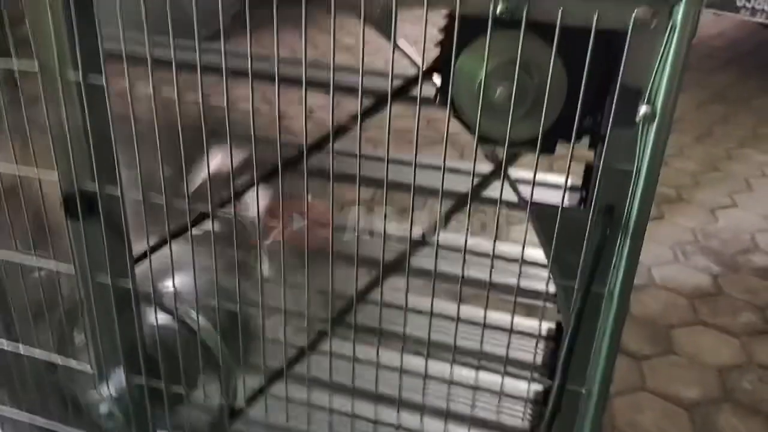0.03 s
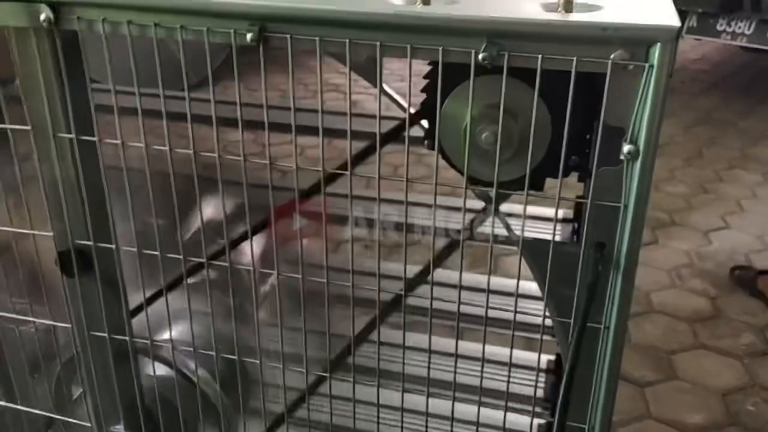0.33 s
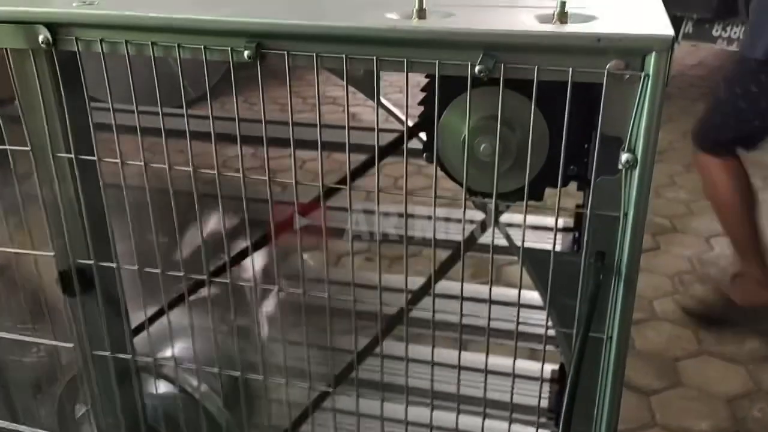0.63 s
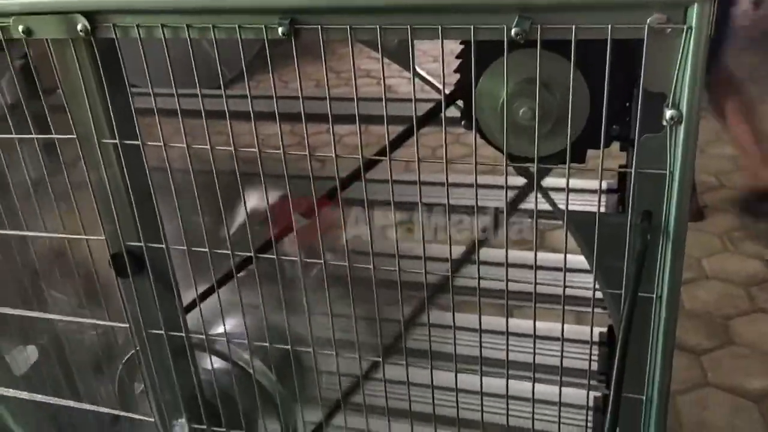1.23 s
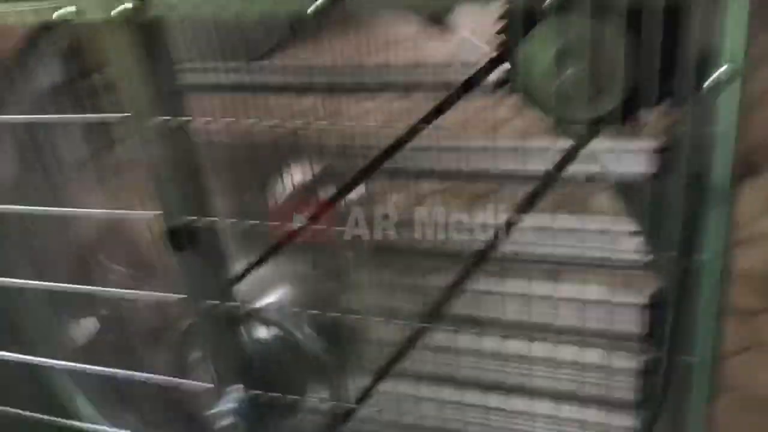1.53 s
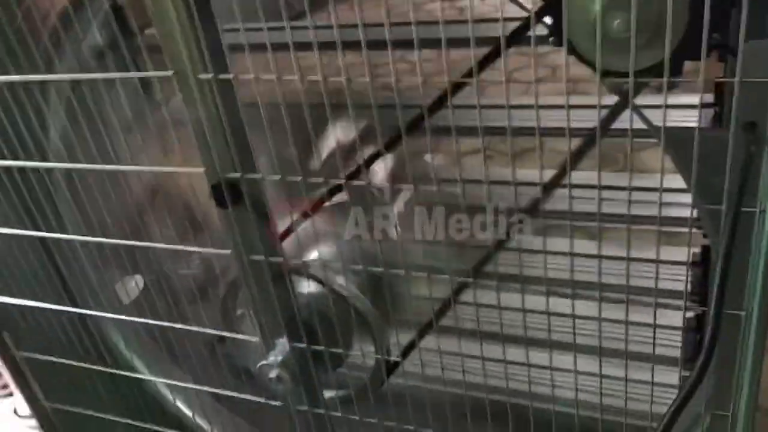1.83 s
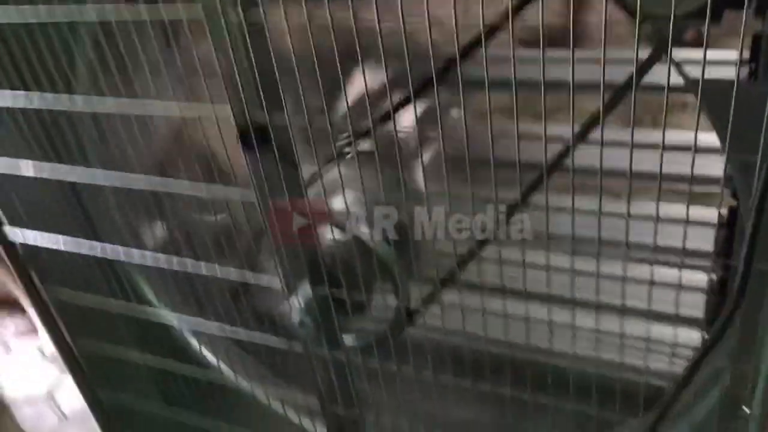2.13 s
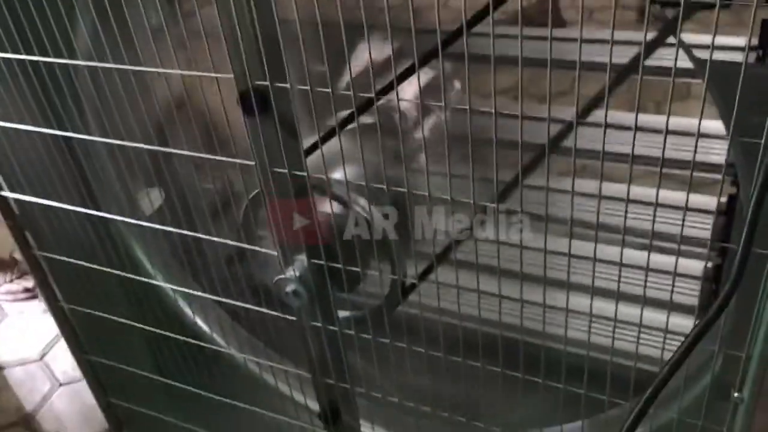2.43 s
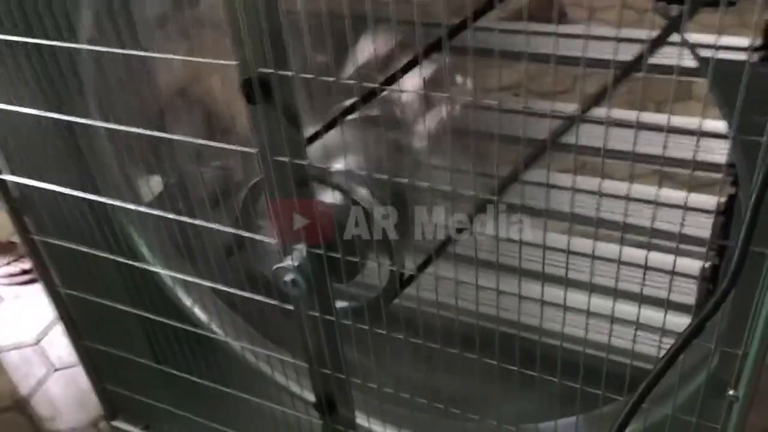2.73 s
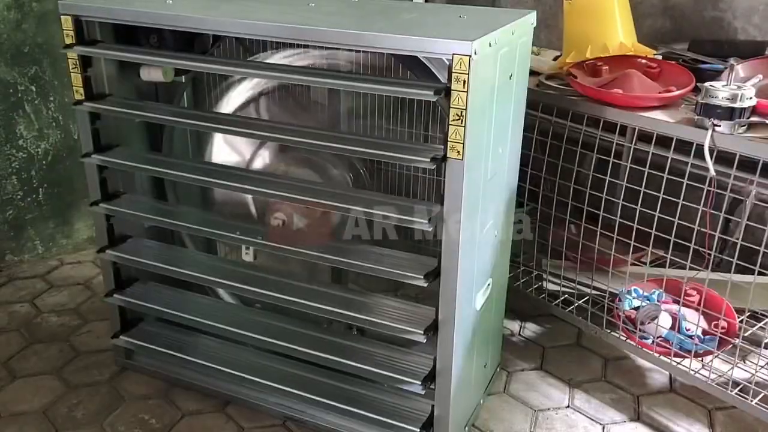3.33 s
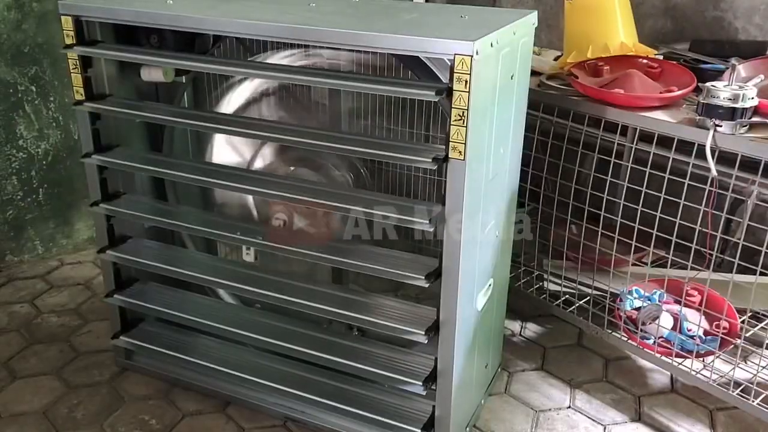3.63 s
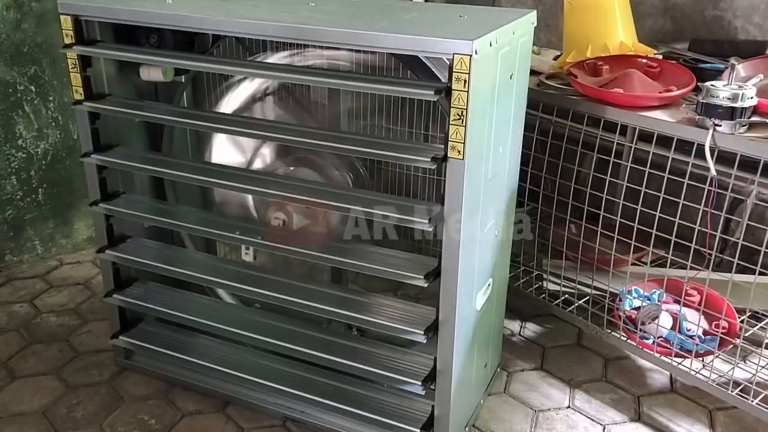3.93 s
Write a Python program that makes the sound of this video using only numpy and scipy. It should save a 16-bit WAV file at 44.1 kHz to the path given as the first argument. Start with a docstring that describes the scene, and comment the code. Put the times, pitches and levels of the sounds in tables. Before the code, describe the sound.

A large exhaust fan drones and rushes, cuts out briefly, then returns louder.

```python
"""Beside a large belt-driven exhaust fan in a sheet-metal box: first close to the wire intake guard,
then, after a short dead silence, at the louvred outlet, where it is louder and steadier.
The blades drone at their passing rate and chop the air into a turbulent roar. The flow excites
the resonances of the housing, and short reflections comb-filter the rush as the listener moves.
Faint ticks and scuffs sound at the guard; the louvres rattle briefly."""
import sys
import numpy as np
from scipy import signal
from scipy.io import wavfile

SR = 44100
rng = np.random.default_rng(int(sys.argv[2]) if len(sys.argv) > 2 else 0)


def persist_wave(psi):
    """Save psi, clipped to +-1, as 16-bit WAV."""
    counts = np.round(np.clip(psi, -1, 1) * 32767).astype(np.int16)
    wavfile.write(sys.argv[1], SR, np.atleast_2d(counts).T)


N = 176400
T = np.arange(N) / SR
BLADE_HZ, BLADES = 56.77, 6
INTAKE_END_S, OUTLET_START_S = 2.997, 3.362


def turbulence(spectrum, coherence, balance, level_db, flutter_db):
    """Turbulent flow makes broadband noise: quarter-octave bands, each moved by level_db(hz); rms 1."""
    edges = 25 * 2 ** np.arange(0, 9.6, .25)
    sides = np.array([[1], [-1]])
    white, out = rng.standard_normal((2, 2, N)), 0
    for k, (low, high) in enumerate(zip(edges, edges[1:])):
        band = signal.butter(2, [low, high], "band", fs=SR, output="sos")
        mid, side = signal.sosfilt(band, white[k % 2])
        hz = np.sqrt(low * high)
        alike = at_hz(coherence, hz)
        pair = np.sqrt(1 + alike) * mid + np.sqrt(1 - alike) * side * sides
        pair *= from_db(sides * at_hz(balance, hz) / 2)
        out += pair * from_db(at_hz(spectrum, hz) + level_db(hz) + flutter_db * drift(13.8))
    return rms_one(out)


def chop(blade_phase, blade_db, wobble_db, eddy_db):
    """Amplitude modulation in dB: once per blade, twice per turn, and by random eddies."""
    wobble = np.cos(2 * blade_phase / BLADES)
    return blade_db * np.cos(blade_phase) + wobble_db * wobble + eddy_db * drift(18)


# Intake noise spectrum: frequency_hz, relative_density_db
INTAKE_SPECTRUM = [(30, -40.5), (75, -23), (130, -9), (160, -2), (330, -1.5), (450, -3.5), (850, -10),
                   (1200, -13), (1700, -15.5), (2300, -19), (3000, -21), (3800, -31), (4400, -25.5),
                   (7000, -50), (8800, -34), (11000, -48.5), (15000, -56)]
# Likeness of the two ears: frequency_hz, correlation
INTAKE_COHERENCE = [(150, .98), (290, .94), (700, .5), (3500, .1)]
# Stereo balance: frequency_hz, left_minus_right_db
INTAKE_PAN = [(300, 0.5), (460, 5.5), (700, -5), (1100, -1.5), (2400, 2.5), (4400, -0.5), (8100, -3.5)]
# Swells of the bass, middle, upper middle and treble: time_s, relative_level_db
BASS_SWELL = [(0.0, 4), (0.3, -0.5), (0.62, 4), (0.84, 0.5), (1.14, 3), (1.74, 0.5), (2.3, 2), (2.98, 1)]
MIDDLE_SWELL = [(0.0, 1), (0.09, 6), (0.15, 2.5), (0.45, 4), (0.81, -1.5), (1.11, 3), (1.29, 1),
                (2.19, 5.5), (2.98, 2.5)]
UPPER_SWELL = [(0.0, -2.5), (1.26, 0), (1.89, 1), (1.98, 5), (2.1, 1), (2.98, 0.5)]
TREBLE_SWELL = [(0.0, -7), (0.15, 3.5), (0.39, -3), (0.81, 5), (1.05, -0.5), (1.38, 0), (1.77, 5),
                (1.92, -2.5), (2.64, -2.5), (2.73, 5), (2.82, -4), (2.98, 2.5)]
# Crossfades between swell zones, lower and upper edge in turn: frequency_hz
ZONE_EDGES = [90, 150, 470, 600, 1100, 1500, 2700, 3500, 5300, 7500]


def intake_rush(chop_db, treble_db):
    """Unsteady inflow: gusts modulate each frequency zone of the turbulence separately."""
    zones = [0, swell(BASS_SWELL), swell(MIDDLE_SWELL), swell(UPPER_SWELL), .45 * treble_db, treble_db]

    def level_db(hz):
        place = np.interp(hz, ZONE_EDGES, (np.arange(len(ZONE_EDGES)) + 1) // 2)
        return chop_db + sum(max(1 - abs(place - k), 0) * db for k, db in enumerate(zones))
    rush = turbulence(INTAKE_SPECTRUM, INTAKE_COHERENCE, INTAKE_PAN, level_db, flutter_db=1.84)
    return from_db(-36) * rush


# Outlet noise spectrum: frequency_hz, relative_density_db
OUTLET_SPECTRUM = [(30, -35), (70, -17), (100, -7), (150, 2.5), (190, -4.5), (300, 3), (420, -3), (560, 2),
                   (750, -2.5), (1100, -8.5), (2200, -10.5), (3200, -21), (4600, -19), (5800, -33.5),
                   (7000, -36), (8500, -32), (10500, -50), (15000, -49)]
# Likeness of the two ears: frequency_hz, correlation
OUTLET_COHERENCE = [(150, .97), (290, .95), (640, .82), (1800, .06)]
# Stereo balance: frequency_hz, left_minus_right_db
OUTLET_PAN = [(1200, -0.2), (4400, 6), (8500, -1), (15000, -7)]


def outlet_rush(blade_phase):
    """Steady outflow: turbulence at the louvres, only lightly modulated by the rotor."""
    chop_db = chop(blade_phase, blade_db=-.1, wobble_db=.37, eddy_db=.06)
    rush = turbulence(OUTLET_SPECTRUM, OUTLET_COHERENCE, OUTLET_PAN, lambda hz: chop_db, flutter_db=1.75)
    return from_db(-27.5) * rush


def drone(harmonics, hum, blade_phase, waver, hum_waver):
    """Periodic forcing gives line spectra; uneven inflow shakes level and phase, more in higher lines."""
    def line(phase, db, shake):
        tone = (1 + shake * drift(5.4)) * np.sin(phase) + shake * drift(4.5) * np.cos(phase)
        return from_db(db) * np.sqrt(2 / (1 + 2 * shake ** 2)) * tone
    blades = sum(line(k * blade_phase, db, waver * k) for k, db in harmonics)
    return blades + sum(line(2 * np.pi * hz * T, db, hum_waver * hz / hum[0][0]) for hz, db in hum)


# Blade-passing tones: harmonic_number, level_db
INTAKE_HARMONICS = [(1, -64), (2, -55), (3, -46), (6, -48)]
# Motor hum and singing panels: pitch_hz, level_db
INTAKE_HUM_TONES = [(100, -55.5), (200, -51.5), (254, -50), (283, -54)]


def intake_drone(blade_phase):
    """Tonal fan noise in gusty flow: the overtones swell with the bass of the rush."""
    tones = drone(INTAKE_HARMONICS, INTAKE_HUM_TONES, blade_phase, waver=.031, hum_waver=.14)
    return tones + above(tones, 110) * (from_db(2.1 * swell(BASS_SWELL)) - 1)


# Blade-passing tones: harmonic_number, level_db
OUTLET_HARMONICS = [(1, -56.5), (2, -40.5), (3, -58), (4, -35)]
# Motor hum and singing panels: pitch_hz, level_db
OUTLET_HUM_TONES = [(100, -48), (328, -44), (439, -42.5), (522.3, -42.5)]


def outlet_drone(blade_phase):
    """Tonal fan noise in even flow: a firmer drone and hum."""
    return drone(OUTLET_HARMONICS, OUTLET_HUM_TONES, blade_phase, waver=.034, hum_waver=.073)


def resonance(hz, width_hz, coherence=.35):
    """A randomly driven mode rings as narrow-band noise about a movable centre; stereo, rms near 1."""
    phase = 2 * np.pi * np.cumsum(hz) / SR
    shared, left, right = [drift(width_hz / 2) * np.sin(phase) + drift(width_hz / 2) * np.cos(phase)
                           for _ in range(3)]
    return np.sqrt(coherence) * shared + np.sqrt(1 - coherence) * np.array([left, right])


# Sheet-metal modes, heard while moving down the guard: pitch_hz, width_hz, start_db, end_db
PANEL_MODES = [(1148, 150, -60, -51.5), (1374, 100, -50, -57.5), (1998, 60, -82.5, -47),
               (2320, 380, -65, -51), (3570, 700, -53, -72.5), (4400, 450, -70.5, -59.5)]
# Hollow resonance that climbs as the listener moves: time_s, pitch_hz, level_db
CAVITY_PATH = [(0, 490, -36), (.5, 470, -59), (.8, 630, -38.5), (1.099, 800, -47), (1.9, 1032, -49.5),
               (2.978, 1052, -52)]


def housing(wander=.028, flutter_hz=5, pan_db=4):
    """Forced resonance: the air stream keeps the sheet metal and the hollow of the box ringing."""
    metal = 0
    for hz, width_hz, start_db, end_db in PANEL_MODES:
        level_db = np.interp(T, [0, INTAKE_END_S], [start_db, end_db]) + 2.6 * drift(flutter_hz)
        metal += from_db(level_db) * resonance(hz * (1 + wander * drift(2.5)), width_hz)
    times, pitches, levels = np.transpose(CAVITY_PATH)
    cavity_db = np.interp(T, times, levels) + 3.2 * drift(flutter_hz)
    cavity = from_db(cavity_db) * resonance(np.interp(T, times, pitches), width_hz=122)
    return (metal + cavity) * from_db(pan_db * np.array([[.5], [-.5]]))


# Gusts that each excite one resonance: peak_s, pitch_hz, level_db
GUSTS = [(0.05, 175, -37), (0.609, 170, -36.5), (0.72, 470, -40), (0.749, 3150, -56), (0.76, 1345, -52),
         (1.129, 1390, -49.5), (1.13, 249.7, -35.5), (1.23, 2670, -57), (1.392, 345, -36), (1.48, 162, -40),
         (1.601, 2490, -54.5), (1.91, 172, -38), (2.01, 2260, -50.5), (2.12, 290, -39.5), (2.20, 650, -42),
         (2.431, 1045, -47.5), (2.58, 370, -39), (2.689, 2360, -51), (2.9, 833, -45.5)]


def flares(rise_hz_per_s=650):
    """Transient excitation: box modes flare and slide up; low ones throb, high ones ring longer."""
    out = 0
    for peak_s, hz, db in GUSTS:
        height = min(hz / 900, 1)  # scales length, slide and bandwidth
        length_s = .06 + .05 * height
        pitch_hz = hz + rise_hz_per_s * height * np.clip(T - peak_s, -length_s, length_s)
        ring = resonance(pitch_hz, 93 * np.sqrt(height), at_hz(INTAKE_COHERENCE, hz))
        envelope = hump(peak_s, length_s)
        power = np.average(np.mean(ring ** 2, axis=0), weights=envelope ** 2)
        out += from_db(db) * envelope * ring / np.sqrt(power)
    return out


def reflections(x, count=12, shortest_s=.0014, longest_s=.0065, sway_s=.0001, shrink_per_s=.22):
    """Comb filtering: echo paths shorten as the listener moves, sweeping peaks and notches upward."""
    upper, echoes, power = above(x, 520), 0, 1
    for lag_s in np.linspace(shortest_s, longest_s, count) * rng.uniform(.93, 1.07, count):
        gain = .36 * drift(4.5)
        delay_s = lag_s * np.exp(-shrink_per_s * T) + sway_s * drift(.93)
        ears = [np.interp(T - delay_s - sway_s / 2 * drift(.84), T, ear) for ear in upper]
        echoes += gain * np.array(ears)
        power += gain ** 2
    return x - upper + (upper + echoes) / np.sqrt(power)


# Louvre rattles: start_s, level_db
LOUVRE_RATTLES = [(3.445, -59), (3.545, -58), (3.652, -54), (3.862, -47)]


def rattles(attack_s=.004, decay_s=.035):
    """Flow-induced vibration: the louvres buzz in bright, exponentially decaying bursts."""
    envelope = 0
    for start_s, db in LOUVRE_RATTLES:
        age_s = np.maximum(T - start_s, 0)
        envelope += from_db(db) * np.minimum(age_s / attack_s, 1) * np.exp(-age_s / decay_s)
    return envelope * rms_one(bright_noise(6500))


# Scuffs at the guard: peak_s, length_s, level_db
GUARD_SCUFFS = [(0.117, 0.12, -61), (0.8, .018, -69)]


def scuffs(grain_db=3):
    """Fast random modulation gives brief, bright noise the grain of a scuff."""
    envelope = sum(from_db(db) * hump(peak_s, length_s) for peak_s, length_s, db in GUARD_SCUFFS)
    return envelope * rms_one(bright_noise(6400) * from_db(grain_db * drift(147)))


def chatter(treble_db, ticks_per_s=260, spread_db=2.5, ring_s=.03):
    """A Poisson process of tiny metallic ticks, denser and stronger when the treble swells."""
    hits = rng.random(N) < ticks_per_s * from_db(treble_db) / SR
    strength = from_db(spread_db * np.minimum(rng.exponential(1, N), 2))
    decay = from_db(-60 / (ring_s * SR))
    envelope = signal.lfilter([1], [1, -decay], hits * strength + 1e-18)
    return from_db(-69.5) * rms_one(bright_noise(7500) * envelope * from_db(.8 * treble_db))


def from_db(db):
    """Decibels to amplitude ratio."""
    return 10 ** (np.asarray(db) / 20)


def rms_one(x):
    """Normalisation to unit rms."""
    return x / np.sqrt(np.mean(x ** 2) + 1e-20)


def at_hz(points, hz):
    """Interpolation on a log-frequency axis."""
    frequencies, values = np.transpose(points)
    return np.interp(np.log(hz), np.log(frequencies), values)


def swell(rows):
    """A level contour in dB about its mean."""
    db = np.interp(T, *np.transpose(rows))
    return db - db.mean()


def drift(rate_hz):
    """Low-passed noise: random motion of unit rms."""
    step, settle = 40, 2000  # samples per control point; points dropped while the filter settles
    pole = np.exp(-2 * np.pi * step * rate_hz / SR)
    white = rng.standard_normal(N // step + settle + 2)
    slow = signal.lfilter([1], [1, -2 * pole, pole * pole], white)[settle:]
    return np.interp(np.arange(N) / step, np.arange(len(slow)), rms_one(slow))


def hump(peak_s, length_s):
    """A Gaussian envelope, above half power for length_s."""
    return .5 ** (2 * ((T - peak_s) / length_s) ** 2)


def above(x, hz):
    """Zero-phase high-pass filtering."""
    return signal.sosfiltfilt(signal.butter(2, hz, "high", fs=SR, output="sos"), x)


def bright_noise(hz):
    """High-passed noise, uncorrelated between the ears."""
    return above(rng.standard_normal((2, N)), hz)


def intake(blade_phase):
    """Superposition at the guard: reflected rush and ring, then flares, ticks, scuffs and drone."""
    treble_db = swell(TREBLE_SWELL) + chop(blade_phase, blade_db=1.4, wobble_db=1, eddy_db=.5)
    chop_db = chop(blade_phase, blade_db=.3, wobble_db=.27, eddy_db=.93)
    rush = intake_rush(chop_db, treble_db)
    tones = intake_drone(blade_phase)
    roar = reflections(rush + housing() * from_db(chop_db))
    # flares and scuffs are each two independent layers, which add in power
    return roar + flares() + flares() + chatter(treble_db) + scuffs() + scuffs() + tones


def scene(cut_s=.0042, fade_s=.09, fade_db=-6):
    """Gating in time: the intake side, silence, then the outlet side fading quickly in."""
    blade_phase = 2 * np.pi * np.cumsum(BLADE_HZ * (1 + .0022 * drift(1))) / SR
    intake_side = intake(blade_phase)
    outlet_side = outlet_rush(blade_phase) + rattles() + outlet_drone(blade_phase)
    intake_gate = np.clip((INTAKE_END_S - T) / cut_s, 0, 1)
    since_s = T - OUTLET_START_S
    outlet_gate = np.clip(since_s / cut_s, 0, 1) * from_db(fade_db * np.clip(1 - since_s / fade_s, 0, 1))
    return intake_gate * intake_side + outlet_gate * outlet_side


def record(dry):
    """Band limiting: an elliptic low-pass cuts steeply above 15.5 kHz."""
    return signal.sosfilt(signal.ellip(12, .1, 80, 15500, fs=SR, output="sos"), dry)


dry = scene()
out = record(dry)
persist_wave(out)
```